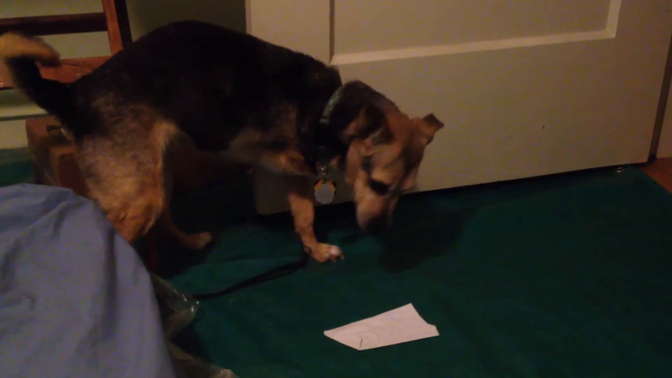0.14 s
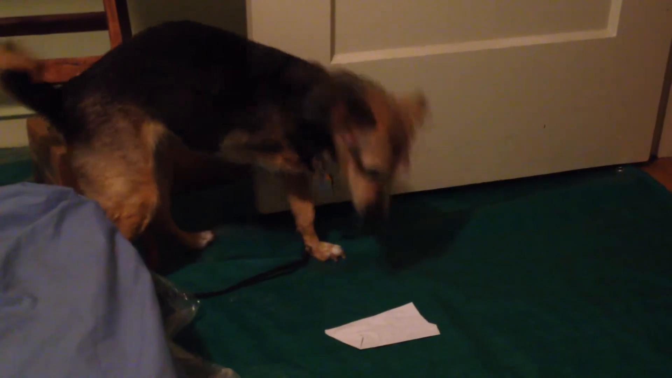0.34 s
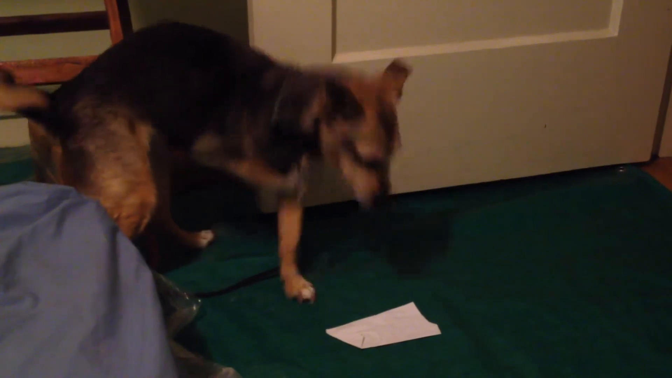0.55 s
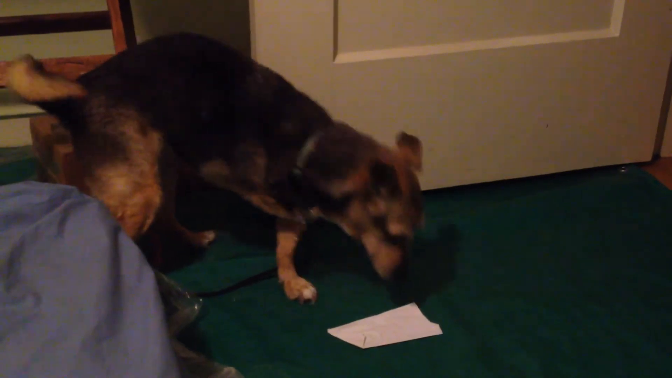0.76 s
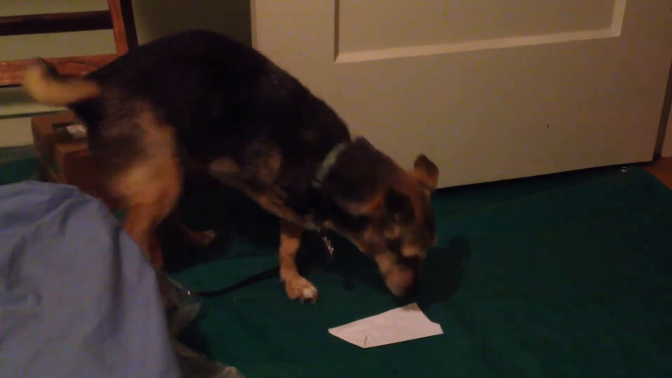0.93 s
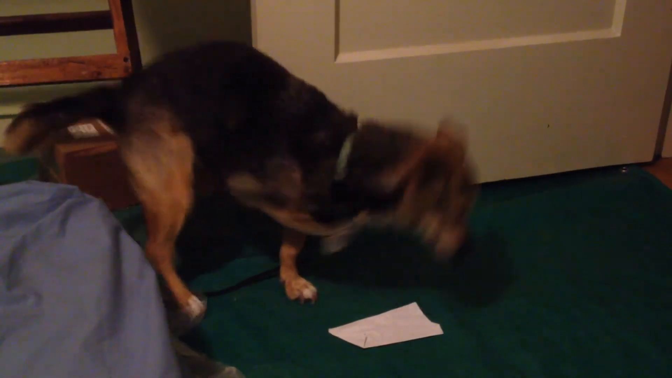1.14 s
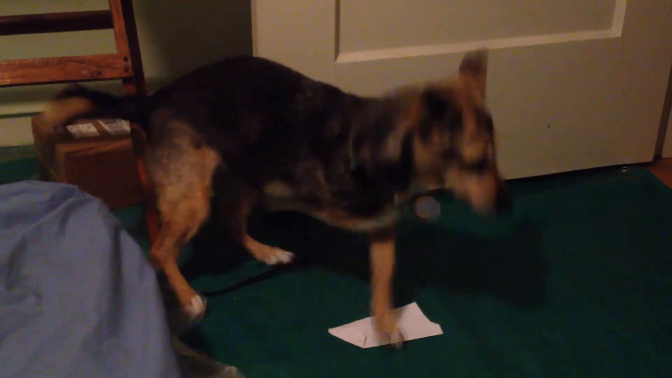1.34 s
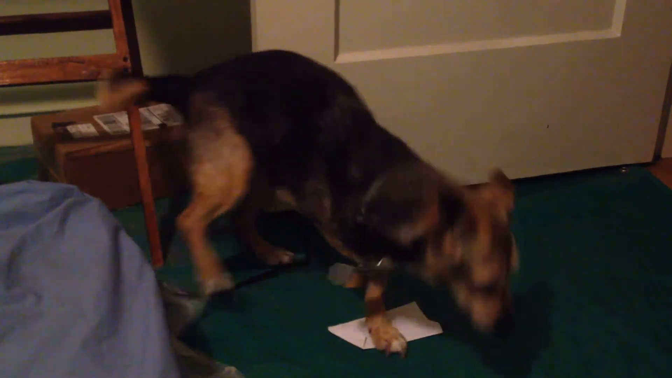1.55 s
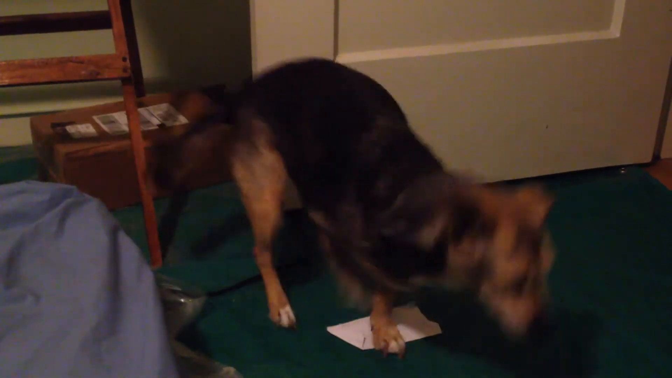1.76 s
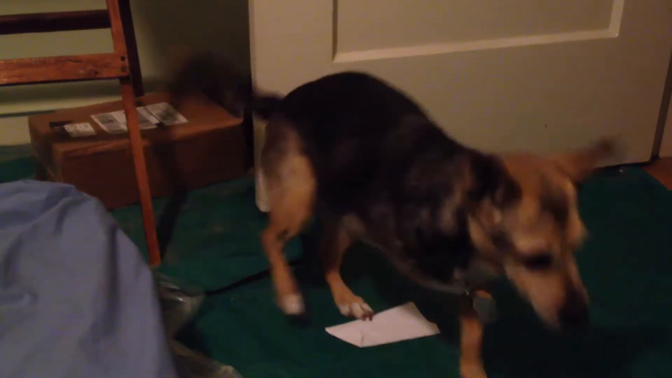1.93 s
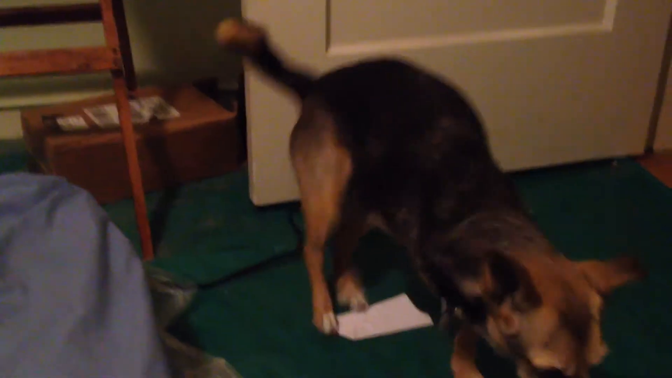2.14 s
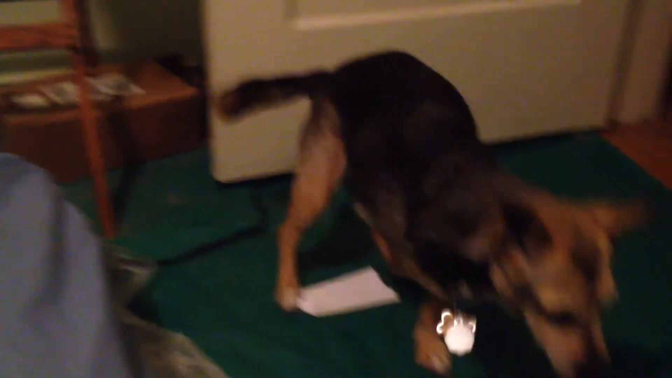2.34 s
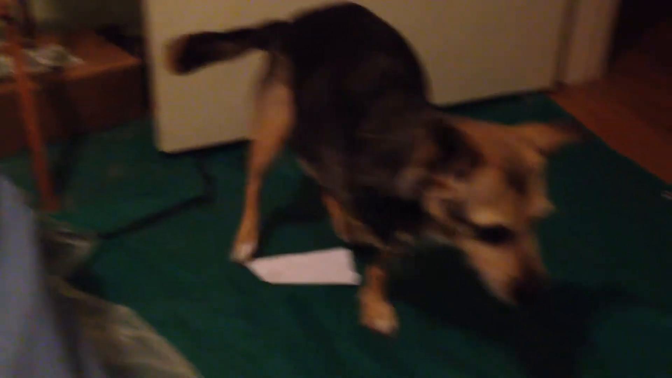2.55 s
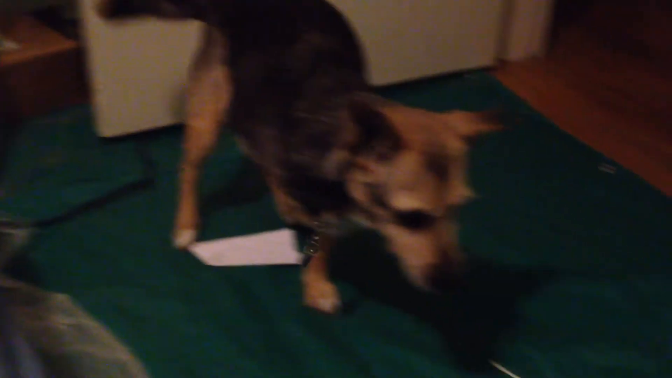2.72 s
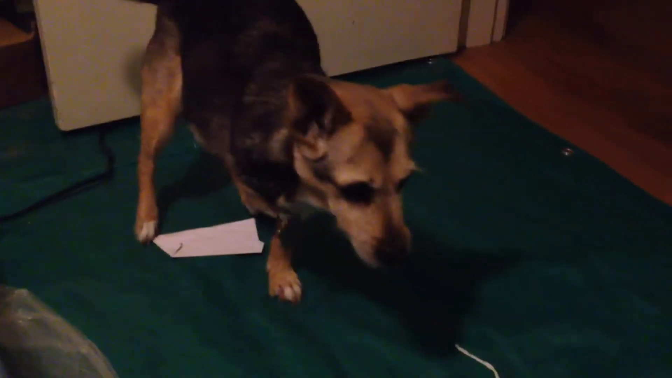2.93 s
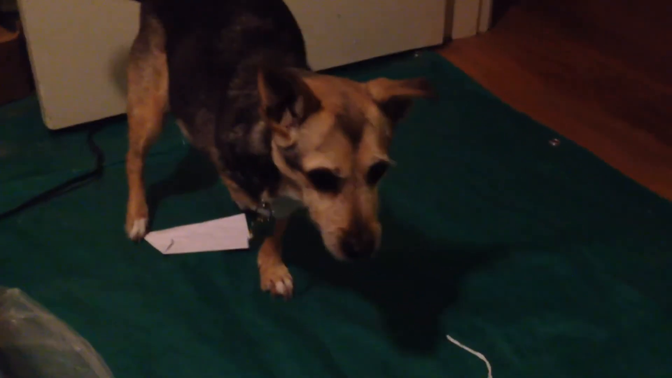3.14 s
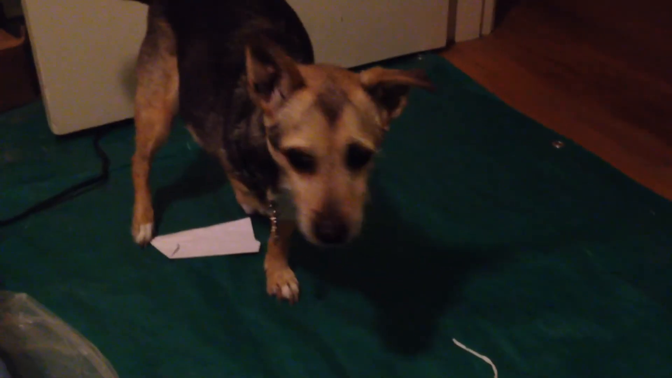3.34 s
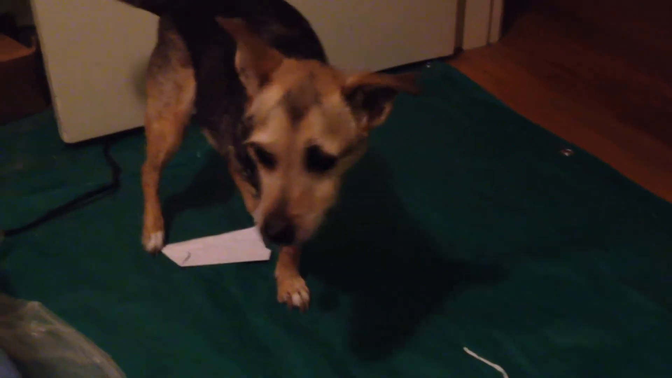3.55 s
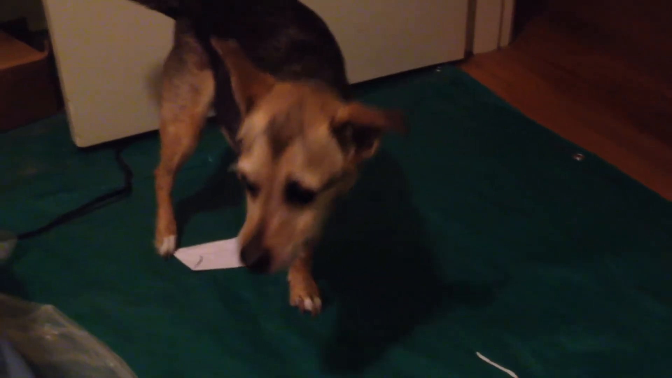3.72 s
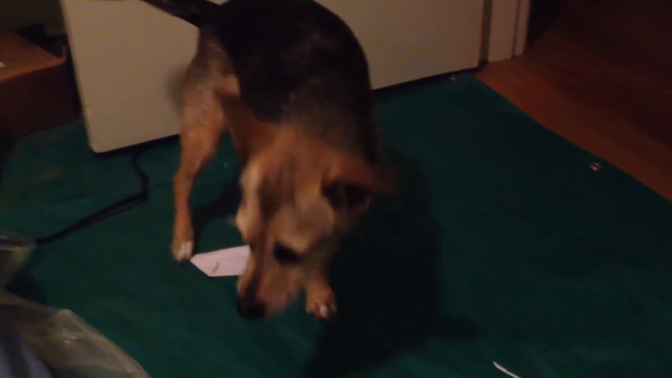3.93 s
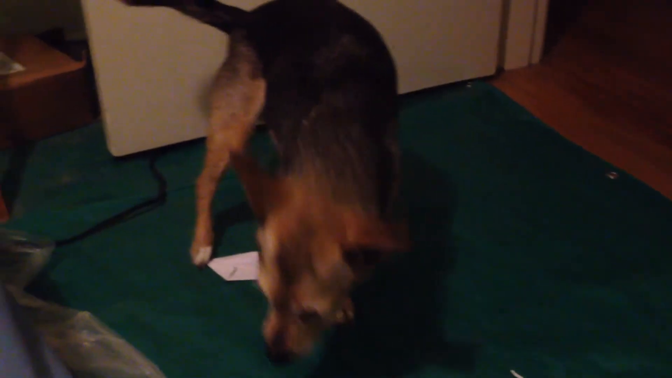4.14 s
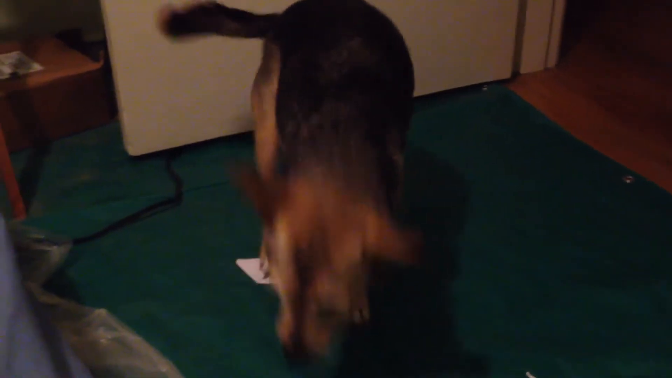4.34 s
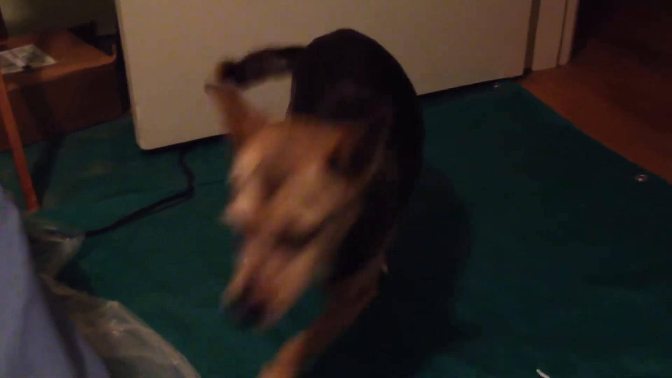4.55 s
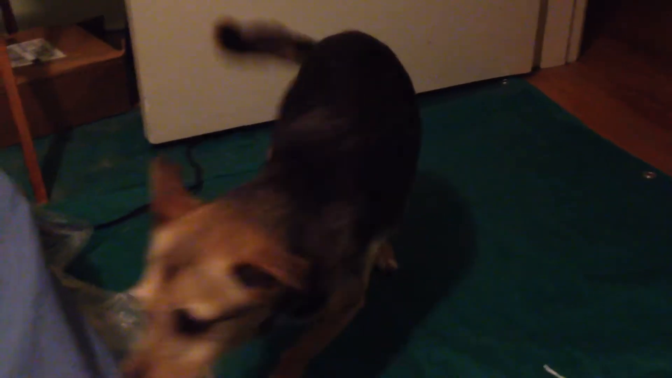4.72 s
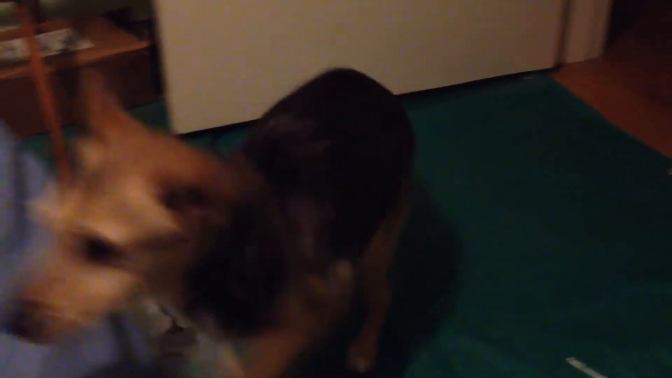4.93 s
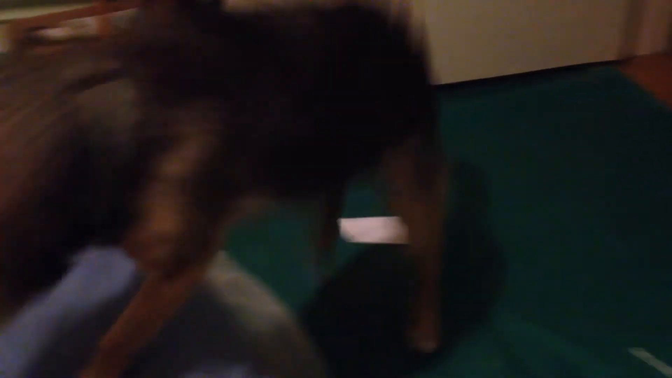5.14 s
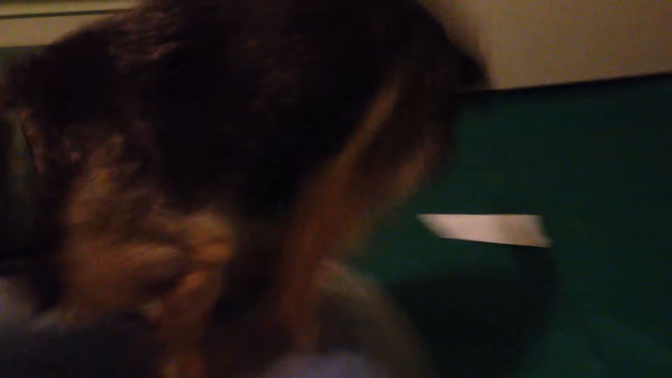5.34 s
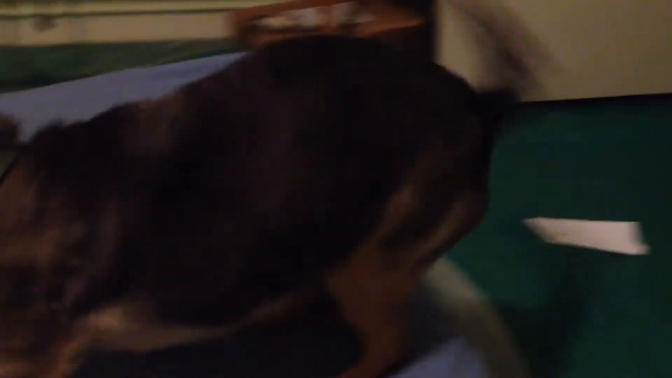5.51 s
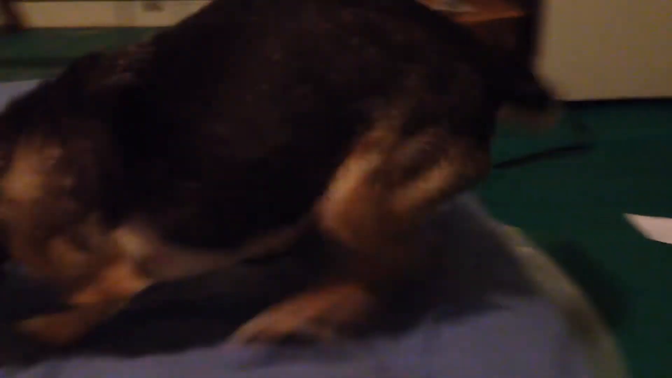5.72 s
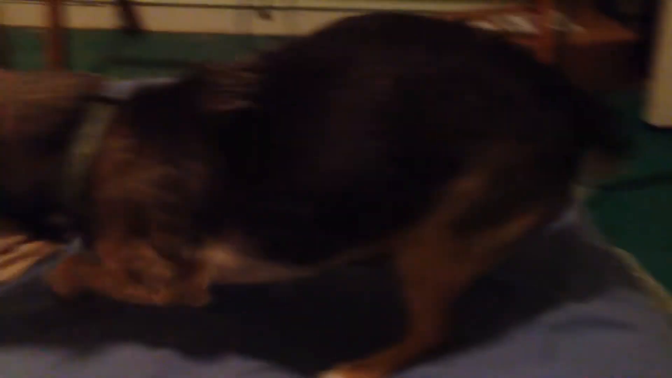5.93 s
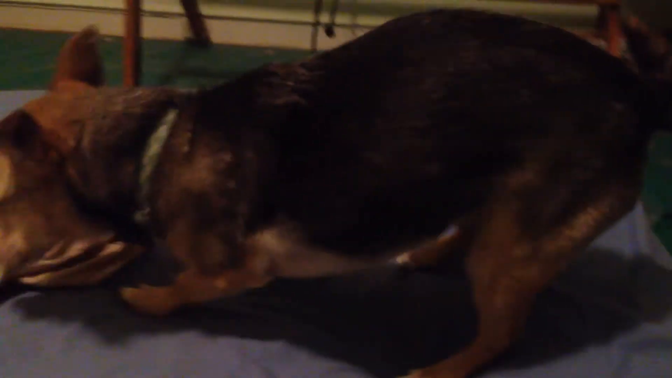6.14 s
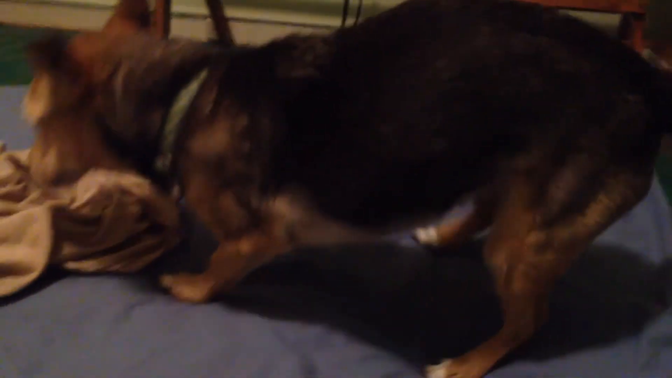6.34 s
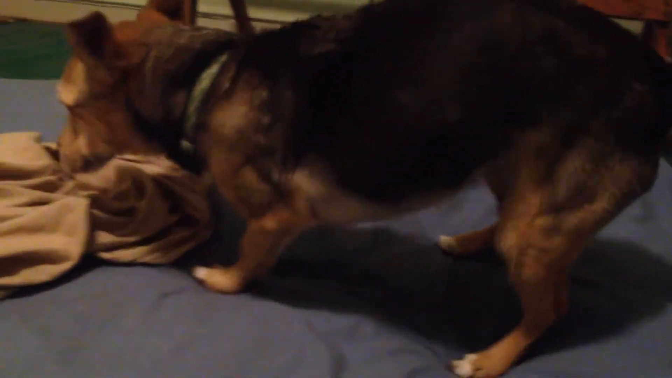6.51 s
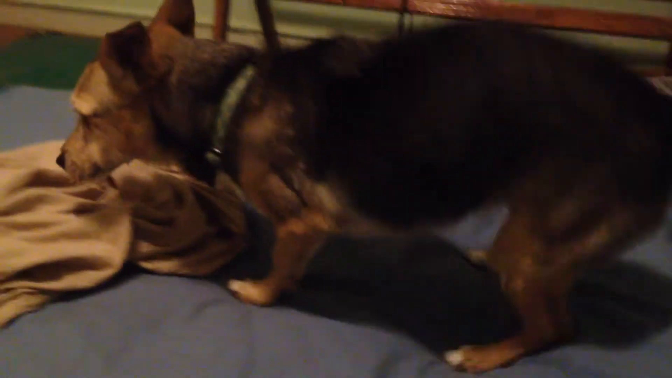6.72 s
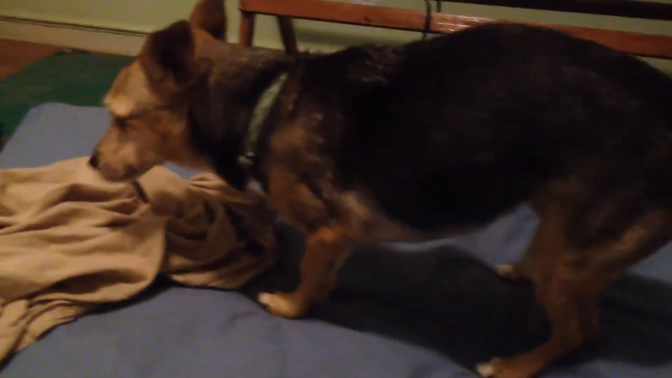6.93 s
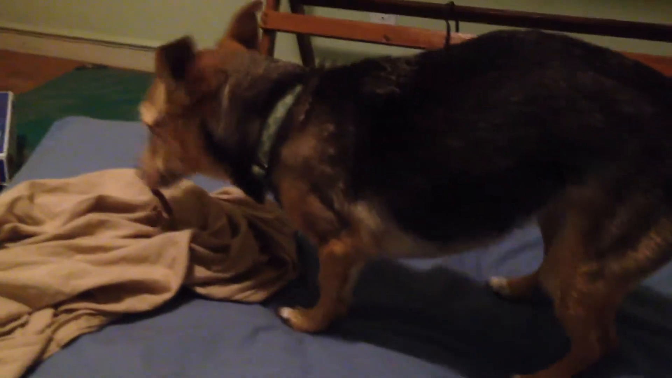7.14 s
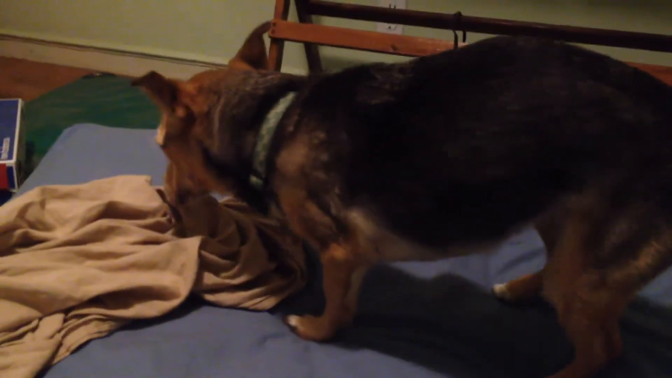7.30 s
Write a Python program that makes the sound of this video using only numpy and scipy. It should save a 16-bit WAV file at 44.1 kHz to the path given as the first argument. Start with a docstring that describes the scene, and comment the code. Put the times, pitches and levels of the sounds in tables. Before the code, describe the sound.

Claw clicks, soft paw thumps and clinking metal dog tags come in two busy bursts, ending with cloth rustling in a quiet room.

```python
"""In a bedroom, a small dog steps about on a stiff floor sheet, then climbs onto bedding.
Its claws snap on the sheet and its paws thump the floorboards. Pads and fur drag over sheet and
cloth with a scuffing sound, and the metal collar tags knock together and ring. The hard walls
echo the steps and clinks, over a quiet room hum and the hiss of the microphone."""
import sys
import numpy as np
from scipy import signal
from scipy.fft import rfft, irfft, next_fast_len
from scipy.io import wavfile
from scipy.ndimage import uniform_filter1d, map_coordinates

SR = 44100
rng = np.random.default_rng(int(sys.argv[2]) if len(sys.argv) > 2 else 0)


def wrap_up_sound(samples):
    """Save the sound to the file named by the first command line argument, as 16-bit audio."""
    columns = np.atleast_2d(samples).T
    # keep every value between -1 and 1, then stretch to whole-number steps
    tamed = np.clip(columns, -1, 1)
    steps = np.round(tamed * 32767).astype(np.int16)
    wavfile.write(sys.argv[1], SR, steps)


N = 325017

# Levels in the tables are relative. A fade time is how long a sound takes to drop by 60 dB.
# The room's hum and hiss. Each row: frequency in Hz, level in dB.
ROOM_TONE = [(25, -42), (80, -15.5), (145, -11.5), (185, -2.5), (250, -6.5), (310, -15.5), (420, -17.5),
             (1000, -18), (2050, -24.5), (3100, -26.5), (6500, -30.5), (7700, -25), (9200, -33),
             (11000, -36.5), (14800, -30.5), (16000, -60)]
# The echo of the room. Each row: frequency in Hz, fade time in seconds.
ECHO_FADE = [(150, 0.56), (700, 0.58), (1800, 0.5), (4800, 0.56), (8000, 0.44), (12800, 0.56)]
# Walls and bedding soak up treble at once. Each row: frequency in Hz, level in dB.
SOAK_UP = [(200, 2), (5000, -2), (9000, -4.5), (15000, -1)]
# The boom of floor and room. Each row: frequency in Hz, width in Hz, level in dB.
BOOM_TONES = [(115.4, 46, -5), (171.6, 39.4, 1), (234, 56, 0.5), (335, 137, -5)]
# The tone of rubbed cloth. Each row: frequency in Hz, level in dB.
CLOTH_COLOUR = [(240, -15.5), (400, -6.5), (726, -8), (1030, -3), (2220, -5), (5230, -8.5), (7670, -1.5),
                (12500, -18.5), (14600, -11), (15500, -33)]
# Pads and fur drag over sheet and bedding. Each row: start in seconds, hold in seconds, level in dB,
# then treble and low drag in dB on top of that level.
STROKES = [(0.295, 0.062, -69, -9, -1), (0.405, 0.039, -62, 0, -17), (0.55, .01, -66.5, 9, -15),
           (0.95, 0.13, -46.5, -1, -12), (1.515, 0.022, -57, 4, -19), (1.544, 0.046, -49.5, -8, -13.5),
           (1.669, 0.052, -52.5, 1, -18), (2.083, 0.0093, -65, 7, -6), (2.17, .005, -59.5, 8, -18),
           (4.191, 0.012, -67, 11, -16), (4.279, 0.059, -60.5, 4.5, -22), (4.367, 0.0055, -53, -2, -25),
           (5.091, 0.016, -46.5, -13, -5.5), (5.198, 0.014, -53, -3, -4.5), (5.34, 0.014, -46, -3, -1.5),
           (5.371, 0.0034, -38.5, 1, -2.5), (5.445, 0.035, -44.5, 6, -17), (5.511, 0.086, -46, 0.5, -6.5),
           (5.656, 0.043, -47, -2, -8.5), (5.78, 0.0071, -38.5, 1, -5), (6.008, 0.0038, -45, -2, -26),
           (6.312, .1, -60.5, 3, -3.5), (6.587, 0.047, -48, 0.5, -13), (6.676, 0.012, -38.5, -5, -8),
           (6.983, 0.013, -59.5, -13, -4), (7.082, 0.072, -55.5, -1.5, -10), (7.35, .03, -56.5, -15, -4)]
# The bedding rustles and settles under the dog. Each row: time in seconds, level in dB.
RUSTLE = [(5.1, -60.5), (5.25, -58), (5.5, -56), (5.92, -51), (6.1, -57), (6.3, -63), (6.5, -60.5),
          (6.85, -60), (7.37, -67.5)]
# The tick of metal hitting metal. Each row: frequency in Hz, level in dB.
TICK_COLOUR = [(3000, -100), (6000, -19.5), (7800, 2), (11000, -9.5), (13000, -13), (14500, -13),
               (17000, -3)]
# The tones of three metal collar pieces. Each row: frequency in Hz, level in dB, fade time in seconds.
DISC = [(6500, -12, 0.052), (7550, 2, 0.086), (10600, -2.5, 0.11), (13670, -22, 0.09), (14230, -5, 0.12)]
PLATE = [(5740, -25, 0.18), (9000, -10, 0.11), (11300, 3, 0.1), (12110, -16, .1), (14030, -2, .1),
         (14700, -16, 0.23)]
LOOP = [(7780, 9.5, 0.044), (14400, -3, 0.037)]
# Collar clinks. Each row: start in seconds, level in dB, the pieces struck, their ring in dB.
CLINKS = [(.1176, -58, LOOP, -27), (.19, -60, LOOP, -35), (.286, -56.5, LOOP, -27), (.367, -61, LOOP, -35),
          (.507, -59, LOOP, -37), (.6933, -49.5, LOOP, -33), (.775, -59, LOOP, -33),
          (0.854, -48.5, LOOP, -25), (1.4925, -58, DISC, -22), (1.5186, -38, DISC, -26),
          (1.637, -39.5, LOOP, -36), (1.723, -40, DISC, -36), (1.738, -46, LOOP, -17),
          (2.119, -48, LOOP, -29), (2.5725, -36, DISC + PLATE, -28), (2.613, -37, LOOP, -31),
          (2.9336, -57, LOOP, -27), (3.6052, -57, LOOP, -28), (3.9736, -62, LOOP, -19),
          (4.74, -48, LOOP, -38), (5.002, -22.5, LOOP, -23.5), (5.0183, -25, DISC, -19),
          (5.0554, -51, DISC, -21), (5.099, -34, LOOP, -11.5), (5.1753, -36, DISC, -13.5),
          (5.2593, -38.5, DISC, -25), (5.475, -23, DISC, -21.5), (5.5457, -32, DISC, -30),
          (5.609, -36, LOOP, -22), (5.665, -41, LOOP, -37), (5.7176, -37, DISC, -35),
          (5.7365, -36.5, DISC, -18), (5.892, -22, LOOP, -55), (6.0374, -59, LOOP, -16),
          (6.0553, -36, LOOP, -24), (6.072, -39, LOOP, -27), (6.081, -45, LOOP, -26),
          (6.223, -52.5, DISC + LOOP, -15.5), (6.3358, -34, PLATE + LOOP, -22), (7.1396, -44, LOOP, -42),
          (7.1694, -53, LOOP, -16)]
# Paws landing. Each row: start in seconds, level in dB, thump in dB, body (low tones) in dB,
# brightness in dB, the frequency the sheet favours in Hz.
PAW_FALLS = [(0.5673, -38, -18.5, -8, -2, 3560), (1.081, -37.5, -28, -3, -16, 2470),
             (1.105, -23.5, -17, -11.5, -3, 2530), (1.2029, -32, -14, -4, -7, 2380),
             (1.2081, -24, -16.5, -19.5, -4, 6800), (1.4055, -45, -25, -2, 4, 5470),
             (1.413, -37.5, -19.5, -21, -23, 2380), (1.704, -32, -36, -20, -9, 6330),
             (1.817, -25, -14, -9, -3.5, 4630), (1.977, -44.5, -16, -12, -6, 4500),
             (2.095, -48, -12, -9, -2.5, 6500), (2.1892, -27, -40, -23.5, -8.5, 4400),
             (2.29, -24, -24, -15, 0, 6000), (2.584, -31, -23.5, -19, -7, 3400),
             (3.6126, -64.5, -20, 1, -18, 2210), (4.218, -47, -30, -23, -2.5, 6550),
             (4.3018, -51, -26, -16, -17, 6210), (4.385, -26, -32, -25, -3.5, 4500),
             (4.471, -22, -15, -12, -4.5, 6900), (4.599, -36, -31, -8, 1.5, 3140),
             (4.76, -34.5, -35, -24, -7, 4400), (4.7781, -18, -40, -28, -10.5, 5960),
             (4.877, -13.5, -26, -19, -3.5, 2800), (5.1066, -34, -42, -14, -31, 3240),
             (5.2103, -39, -32, -10.5, -26, 2180), (5.3855, -27, -23.5, 0.5, -9, 7200),
             (5.463, -33.5, -43, -9, -14, 2420), (5.7906, -36, -14, -3, -8, 2420),
             (5.961, -42, -24, -13, -11, 2640), (6.2841, -52.5, -19, 6, 6.5, 6200),
             (6.393, -55, -28, 10, 13, 5800), (6.9254, -49, -35, -6, -26, 2340),
             (7.015, -42.5, -30, -9, -8, 5660), (7.3527, -49, -19, -4, -1.5, 2240)]

ONTO_BEDDING_S = 5.15
SHEET_CONTACT_MS, BEDDING_CONTACT_MS = 6.63, 3.3  # claws skid on the sheet, only catch on cloth


def amp(db):
    """Turn decibels into a gain to multiply by."""
    return 10 ** (np.asarray(db) / 20)


def unit(x):
    """Scale a signal to an average power of 1."""
    return x / np.sqrt(np.mean(x ** 2) + 1e-20)


def along(points, hz):
    """Read between (Hz, value) points on a logarithmic frequency scale."""
    freqs, values = np.transpose(points)
    return np.interp(np.log(hz + 1), np.log(freqs + 1), values)


def wobble(rate):
    """A smooth curve through `rate` random values a second."""
    return map_coordinates(rng.standard_normal(int(N * rate / SR) + 4), [np.arange(N) * rate / SR])


def filtered(x, response):
    """Filter x; response(hz) says how each frequency passes."""
    size = next_fast_len(len(x) + 8192)
    return irfft(rfft(x, size) * response(np.fft.rfftfreq(size, 1 / SR)), size)[:len(x)]


def coloured(x, spectrum):
    """Shape the tone of x by (Hz, dB) points, keeping its start sharp."""
    size = next_fast_len(2 * len(x), real=True) // 2 * 2
    cepstrum = irfft(np.log(amp(along(spectrum, np.fft.rfftfreq(size, 1 / SR)))), size)
    # make the filter ring only after a sound, never before it
    cepstrum[1:size // 2] *= 2
    cepstrum[size // 2 + 1:] = 0
    return irfft(rfft(x, size) * np.exp(rfft(cepstrum)), size)[:len(x)]


def add(track, start, sound):
    """Mix a sound into the track at `start` seconds."""
    part = track[round(start * SR):][:len(sound)]
    part += sound[:len(part)]


def room_tone():
    """A low hum and a smooth hiss, wavering a little in level."""
    tone = unit(filtered(rng.standard_normal(N), lambda hz: amp(along(ROOM_TONE, hz))))
    return tone * amp(-64.5 + 0.87 * wobble(3.84))


def wall_echo(x, level_db, rise_ms, gap_ms=6):
    """The walls answer after a short gap with a noisy tail; each frequency fades at its own speed."""
    hz, t, spectra = signal.stft(rng.standard_normal(SR // 2), SR, nperseg=256)
    fade = amp(-60 * t / along(ECHO_FADE, hz)[:, None])
    tail = signal.istft(spectra * fade, SR, nperseg=256)[1]
    ms = 1000 * np.arange(len(tail)) / SR
    tail *= np.clip((ms - gap_ms) / rise_ms, 0, 1)
    return signal.fftconvolve(x, amp(level_db) * tail / np.linalg.norm(tail))


def floorboards(hz):
    """A filter for the boards, which boom at a few low frequencies when pushed."""
    return sum((-1) ** k * amp(db) * 1j * hz * width / (centre ** 2 - hz ** 2 + 1j * hz * width)
               for k, (centre, width, db) in enumerate(BOOM_TONES))


def dragging():
    """How strongly the strokes and the rustle rub over time: gains for body, treble and low drag."""
    t, power = np.arange(N) / SR, np.zeros((3, N))
    for start, hold, db, treble_db, drag_db in STROKES:
        rise = 0.0066 + 0.23 * hold
        part = slice(round(start * SR), round((start + .6) * SR))
        age = t[part] - start
        swell = np.minimum(age / rise, 1) ** 2
        fade = amp(-171 * np.maximum(age - rise - hold, 0))  # 171 dB a second
        power[:, part] += (amp(db + np.array([[0], [treble_db], [drag_db]])) * swell * fade) ** 2
    rustle_db = np.interp(t, *np.transpose(RUSTLE))
    rustle = (t > RUSTLE[0][0]) * amp(rustle_db + np.array([[0], [-12.5], [-8.5]]))
    return np.sqrt(power + rustle ** 2)


def crinkles(gain, per_second=60, fade_s=0.003):
    """Folds of cloth and sheet snap at random under a drag: one duller and one brighter set of ticks."""
    t, out = np.arange(400) / SR, 0
    for cut_hz in (1200, 4500):
        snaps = rng.random(N) < per_second / SR
        sizes = amp(2.5 * np.minimum(rng.exponential(size=N), 2.5))
        ticks = signal.fftconvolve(snaps * sizes, amp(-60 * t / fade_s))[:N] * rng.standard_normal(N)
        out += filtered(ticks, lambda hz: amp(along(CLOTH_COLOUR, hz) + 8) / (1 + (cut_hz / (hz + 1)) ** 4))
    return amp(4.5) * gain * out


def scuff():
    """Fibres catch and let go: tiny uneven clicks on a fluttering hiss, with a low drag under them."""
    body_gain, treble_gain, drag_gain = dragging()
    grains = (rng.random(N) < .015) * rng.standard_normal(N)
    grains *= amp(3 * np.minimum(rng.exponential(size=N), 3.5))
    flutter = amp(1.1 * wobble(60) + 1.4 * wobble(150))
    friction = unit(rng.standard_normal(N) + 0.52 * unit(grains)) * flutter
    cloth = filtered(friction, lambda hz: amp(along(CLOTH_COLOUR, hz)))
    treble = filtered(cloth, lambda hz: 1 / (1 + (5500 / (hz + 1)) ** 6))
    drag = unit(filtered(rng.standard_normal(N), floorboards))
    rub = body_gain * unit(cloth - treble) + treble_gain * amp(-5) * unit(treble)
    return rub + drag_gain * amp(0.5) * drag + crinkles(body_gain)


def collar():
    """Each clink is a sharp tick that rings the metal struck; fur and rattling make the ring uneven."""
    out, t, points = np.zeros(N), np.arange(SR // 4) / SR, np.arange(64)
    onset = np.minimum(t / 0.00046, 1)
    for start, db, tones, ring_db in CLINKS:
        # after the first hit the pieces chatter against each other
        chatter = (rng.random(len(t)) < .003) * rng.standard_normal(len(t)) * amp(-9.5 - 60 * t / 0.91)
        tick = rng.standard_normal(len(t)) * amp(-60 * t / 0.0096)
        clink = coloured(tick + chatter, TICK_COLOUR)
        for hz, tone_db, fade_s in tones:
            nudges = np.clip(rng.standard_normal(64), -2, 1) * np.minimum(points / 2, 1)
            touch = np.interp(t, points / 256, nudges)
            gain = amp(ring_db + tone_db + rng.normal(0, 3.5) + 7.7 * touch - 60 * t / fade_s)
            pitch = hz * (1 + rng.normal(0, 0.0027))
            rattle_radians = 1.8 * touch[::-1]
            clink += gain * onset * np.sin(2 * np.pi * pitch * t + rattle_radians)
        add(out, start, amp(db + 8.5) * clink)
        add(out, start, wall_echo(amp(db + 6) * clink, level_db=-7, rise_ms=5))
    return out


def claw_scrape(contact_ms, power=0.28):
    """Claws scrape for a few milliseconds: a short, rough burst of noise."""
    progress = 1000 * np.arange(2048) / SR / contact_ms
    roughness = unit(amp(3 * np.repeat(rng.standard_normal(128), 16)))
    rise = 1 - np.exp(-(progress / 0.2) ** 2)
    fall = np.exp(-.5 * progress - progress ** 4)
    burst = roughness * rng.standard_normal(2048) * rise * fall
    return burst / np.linalg.norm(burst) * np.sqrt(power * np.sum(progress < 1))


def step_colour(hz, db, body_db, bright_db, sheet_hz):
    """The tone of one step in dB: the patch under the paw favours one band, amid random peaks and dips."""
    mid_db = -6.5 + 0.46 * body_db
    top_db = -18 + 0.92 * bright_db - 0.05 * db  # the highest treble grows less in hard steps
    outline = [(200, body_db - 14), (800, body_db + 11.5), (1300, mid_db + 8), (2100, mid_db + 16),
               (3800, 0), (7000, bright_db + 5.5), (8800, bright_db + 2),
               (10500, top_db + 2), (15000, top_db - 2.5)]
    ripples = 2.5 * unit(uniform_filter1d(rng.standard_normal(len(hz)), size=4))
    sheet_peak = 6 / (1 + ((hz - sheet_hz) / 350) ** 2)
    return along(outline, hz) + ripples + sheet_peak


def steps():
    """Claws land with a crack; the weight of the paw follows and thumps the boards."""
    out, hz = np.zeros(N), np.geomspace(200, 15000, 120)
    for start, db, thump_db, body_db, bright_db, sheet_hz in PAW_FALLS:
        scrape = claw_scrape(SHEET_CONTACT_MS if start < ONTO_BEDDING_S else BEDDING_CONTACT_MS)
        colour_db = step_colour(hz, db, body_db, bright_db, sheet_hz)
        crack = coloured(scrape, np.transpose([hz, colour_db]))
        add(out, start - .001, amp(db + 3.5) * crack)
        push = np.pad(np.hanning(70) * amp(db + thump_db + 18.5), (150, 6000))
        thump = filtered(push, floorboards)
        add(out, start, thump)
        # the walls get the crack from all sides, which evens out its peaks and dips
        click = np.linalg.norm(scrape) * signal.unit_impulse(len(scrape))
        even_crack = coloured(click, np.transpose([hz, uniform_filter1d(colour_db, size=9)]))
        to_walls = amp(2) * thump
        add(to_walls, 0, amp(db + 2.5) * coloured(even_crack + amp(-9.5) * crack, SOAK_UP))
        add(out, start, wall_echo(to_walls, level_db=1.17, rise_ms=0.5))
    return out


def scene():
    """All the sounds together in one channel."""
    return (steps() + collar() + scuff() + room_tone())[None]


def record(dry, bass_hz=90, top_hz=15500):
    """The microphone drops the deep bass and the very highest treble."""
    return filtered(dry[0], lambda hz: (1j * hz / (bass_hz + 1j * hz)) ** 2
                    / (1 + (hz / top_hz) ** 120))[None]


dry = scene()
out = record(dry)
wrap_up_sound(out)
```